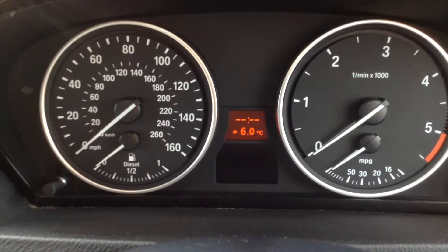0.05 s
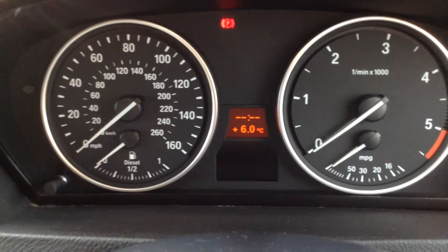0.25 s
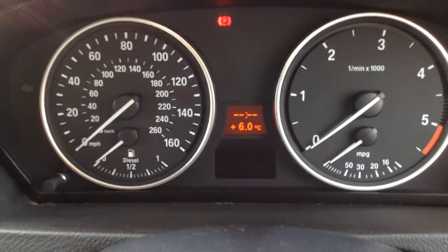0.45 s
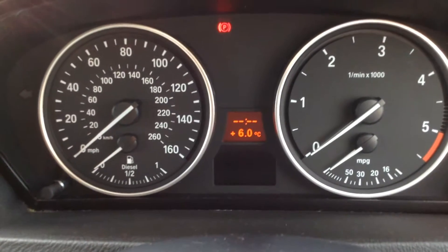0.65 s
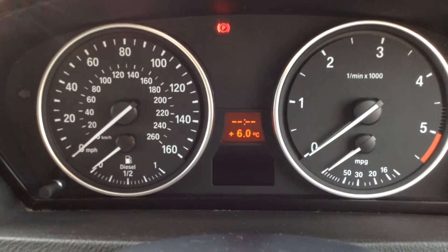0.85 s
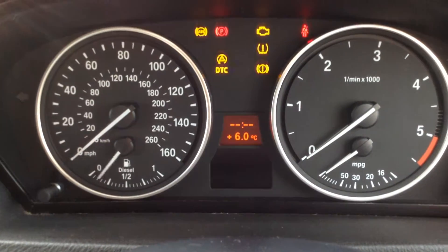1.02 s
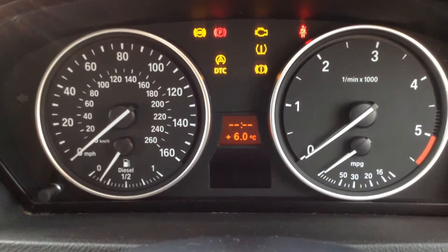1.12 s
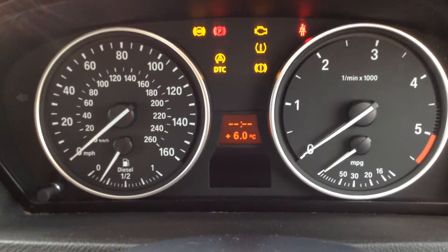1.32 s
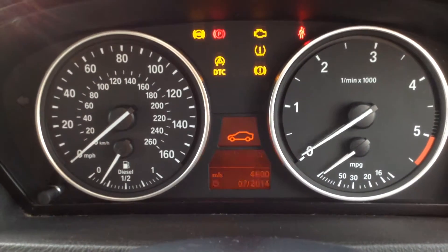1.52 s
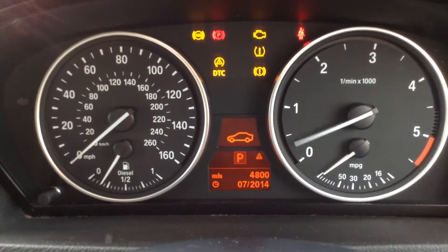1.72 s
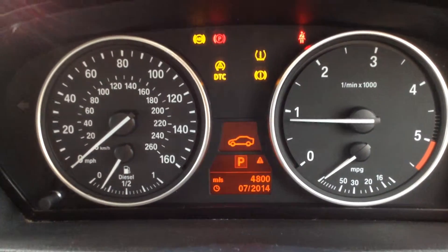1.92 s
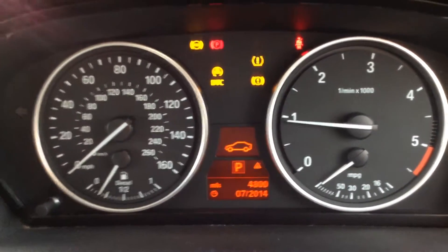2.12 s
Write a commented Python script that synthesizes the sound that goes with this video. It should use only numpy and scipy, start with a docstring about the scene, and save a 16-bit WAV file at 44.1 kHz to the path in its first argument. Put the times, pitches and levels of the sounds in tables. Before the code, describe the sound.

A diesel car engine starts, heard muffled from the driver's seat over faint cabin hiss. Close hand rubbing, rustling and plastic knocks until 0.4 s; a crisp button click at 0.43. A soft pump whirrs from 0.75, a relay snaps at 0.96, and the starter whines and grinds from 1.0 to 1.3. Two groaning firings at 1.35 and 1.45, low thumps, then quickening rumble with light clatter; handling knocks return after 2.0.

```python
"""Driver's seat of a diesel car being started. A hand rubs, rustles and knocks near the microphone
(coloured noise, struck bands, ringing modes); the start button clicks, a fuel pump whirrs (noise) and
a relay snaps. The starter whines over one compression (tooth-rate harmonics plus grinding noise), two
first firings shake the body, and the muffled engine runs up towards idle: noise and wavering
resonances, surging at the firing rate. Cabin hiss lies under it all."""
import sys
import numpy as np
from scipy import signal
from scipy.fft import rfft, irfft, next_fast_len
from scipy.io import wavfile
from scipy.ndimage import map_coordinates

SR = 44100
rng = np.random.default_rng(int(sys.argv[2]) if len(sys.argv) > 2 else 0)


def file_out(sig):
    """Save sig as 16-bit WAV at sys.argv[1]."""
    # one column per channel
    cols = np.atleast_2d(sig).T
    # limit, then scale
    lim = np.clip(cols, -1, 1)
    pcm = np.round(lim * 32767).astype(np.int16)
    wavfile.write(sys.argv[1], SR, pcm)


N = 95608
T = np.arange(N) / SR  # s


def amp(db):
    """Decibels to gain."""
    return 10 ** (np.asarray(db) / 20)


def unit(x):
    """Scale to rms 1."""
    return x / np.sqrt(np.mean(x ** 2) + 1e-20)


def along(points, hz):
    """Read (Hz, value) points on a log-frequency axis."""
    f, v = np.transpose(points)
    return np.interp(np.log(hz + 1), np.log(f + 1), v)


def curves(rows):
    """One value per sample for each column after the time."""
    time_s, *columns = np.transpose(rows)
    return [np.interp(T, time_s, column) for column in columns]


def wobble(rate):
    """Smooth random curve, rate knots per second."""
    return map_coordinates(rng.standard_normal(2048), [T * rate], mode="wrap")


def filtered(x, response):
    """Multiply the spectrum of x by a response of frequency."""
    size = next_fast_len(N + 8192)
    spectrum = rfft(x, size) * response(np.fft.rfftfreq(size, 1 / SR))
    return irfft(spectrum, size)[:N]


def noise(colour):
    """Noise of rms 1 with a (Hz, dB) colour, falling away beyond its ends."""
    low_hz, high_hz = colour[0][0], colour[-1][0]

    def response(hz):
        skirt = np.minimum(1, hz / low_hz) ** 2 / np.maximum(1, hz / high_hz) ** 2
        return amp(along(colour, hz)) * skirt

    return unit(filtered(rng.standard_normal(N), response))


def turns(hz):
    """Phase in radians of a moving frequency, from a random start."""
    return 2 * np.pi * (np.cumsum(hz) / SR + rng.random())


def tone(hz, waver, rate):
    """Slightly unsteady sine of rms 1; waver is a fraction of hz."""
    return np.sqrt(2) * np.sin(turns(hz * (1 + waver * wobble(rate))))


def struck(start_s, t60_s, attack_s=0.00068):
    """Envelope of a blow: exponential attack, 60 dB decay in t60_s."""
    t = np.maximum(T - start_s, 0)
    return (1 - np.exp(-t / attack_s)) * amp(-60 * t / t60_s)


def ringing(modes, waver, rate):
    """Resonances kept going by random shaking, each swelling on its own."""
    return sum(amp(db + 1.22 * wobble(18)) * tone(hz, waver, rate) for hz, db in modes)


# still cabin and microphone hiss: freq_hz, level_db
CABIN_COLOUR = [(25, -28), (60, -14), (105, 6), (215, 0.5), (350, 0), (630, -0.5), (800, -4), (1750, -11.5),
                (5000, -17), (11000, -7.5), (15500, -12.5)]
CABIN_DB = -69.5


def cabin():
    """Steady coloured noise of the still cabin and microphone."""
    return amp(CABIN_DB) * noise(CABIN_COLOUR)


# hand on casing and trim: time_s, rub_db, rustle_db
HAND_LEVELS = [(0, -45, -51), (.022, -42.5, -50), (.055, -51.5, -46.5), (.1, -55, -52.5),
               (.135, -59, -60.5), (.175, -57.5, -56.5), (.208, -49, -52), (.245, -59, -60.5),
               (.3, -58, -61.5), (.34, -64, -63.5), (.45, -64.5, -63), (.53, -76, -69), (.65, -84, -72.5),
               (.85, -75, -67), (1.15, -81, -72), (1.35, -95, -90), (1.96, -80, -80), (2.005, -67, -58.5),
               (2.04, -66, -61), (2.072, -72, -48.5), (2.105, -49.5, -60), (2.17, -61, -59)]
# dull rubbing: freq_hz, level_db
RUB_COLOUR = [(40, -54), (85, -5), (130, 10), (190, 4.5), (330, -1), (480, -2.5), (760, -4.5), (1200, -5.5),
              (2500, -14.5), (5000, -76)]
# grainy rustle: freq_hz, level_db
RUSTLE_COLOUR = [(500, -26), (1500, -7.5), (3000, -4.5), (4500, -3), (6500, -6), (10000, -7), (15000, -11)]
# casing resonances stirred by rubbing: freq_hz, level_db
RUBBED_MODES = [(150, -9), (262, -13), (486, -12), (648, -12)]


def hand():
    """Dull rubbing stirs the casing resonances; a grainy rustle flickers beside it."""
    rub_db, rustle_db = curves(HAND_LEVELS)
    rub = 0.82 * noise(RUB_COLOUR) + ringing(RUBBED_MODES, waver=0.028, rate=74)
    rub *= amp(rub_db + 2.7 * wobble(80))
    rustle = amp(rustle_db + 0.95 * wobble(350)) * noise(RUSTLE_COLOUR)
    return rub + rustle


# small knocks and ticks of plastic: start_s, level_db, centre_hz, width_octaves, t60_s
TRIM_TICKS = [(0.018, -35, 192, 0.64, 0.15), (0.017, -47, 650, 0.46, 0.027),
              (0.0235, -38, 7400, 1.47, 0.018), (0.0499, -30.5, 4450, 0.31, 0.017),
              (0.05, -35.5, 10500, 0.64, 0.012), (0.0831, -36, 3080, 0.7, 0.033),
              (0.115, -49, 2780, .8, 0.028), (0.18, -38, 193, .35, 0.042), (0.195, -38, 3830, 0.72, 0.028),
              (0.2016, -30.5, 8900, 2.6, 0.018), (.201, -36.5, 403, 1.7, 0.031),
              (.362, -55, 1580, 0.65, 0.058), (0.408, -41.5, 2550, 1.6, 0.066),
              (.451, -47, 960, 0.48, 0.044), (.504, -59, 11000, 0.47, 0.027),
              (.5815, -55, 1440, 2.8, 0.063), (.66, -64, 13000, .3, 0.064),
              (0.689, -56.5, 625, 0.14, 0.033), (0.725, -58, 3950, 1.76, 0.026),
              (0.8131, -48, 1800, 0.55, 0.041), (1.049, -55.5, 6050, 2, 0.092),
              (1.562, -49.5, 895, 0.72, .06), (1.629, -59.5, 3230, 0.27, 0.044),
              (1.709, -55, 4500, 1.3, .05), (2, -46, 1080, 0.21, 0.025), (2.0151, -35, 2970, 0.5, 0.019),
              (2.025, -39.5, 1780, 0.62, 0.03), (2.086, -40, 3530, 0.27, 0.054),
              (2.131, -50.5, 2500, 2.2, 0.051)]
SNAP_GAIN, SNAP_T60_S = 0.4, 0.0027  # first contact, relative to the ring


def ticks():
    """Plastic trim: a snap, then a ring dying in its own band; low knocks start softly."""
    out = np.zeros(N)
    for start_s, level_db, centre_hz, width_octaves, t60_s in TRIM_TICKS:
        def band(hz):
            return 1 / (1 + (np.log2((hz + 1) / centre_hz) / width_octaves) ** 2)

        attack_s = 1 / centre_hz
        ring = struck(start_s, t60_s, attack_s)
        snap = SNAP_GAIN * struck(start_s, SNAP_T60_S, attack_s)
        out += amp(level_db) * (ring + snap) * unit(filtered(rng.standard_normal(N), band))
    return out


# knock that sets the casing ringing: start_s, level_db
CASING_KNOCK = (.201, -53)
# casing modes: freq_hz, level_db, t60_s
CASING_MODES = [(436, 2.5, 0.059), (599, 3, 0.1), (719, -7, 1), (790, -6, 0.95), (947, -7.5, 0.78),
                (1314, -16, 0.7), (3460, -9, 0.51)]


def casing():
    """A firm knock leaves the casing ringing unevenly."""
    start_s, knock_db = CASING_KNOCK
    out = np.zeros(N)
    for hz, mode_db, t60_s in CASING_MODES:
        level = amp(knock_db + mode_db + 3.1 * wobble(47.2))
        out += level * struck(start_s, t60_s) * tone(hz, waver=0.0285, rate=200)
    return out


# start button, blow and bounce: start_s, level_db
BUTTON_BLOWS = [(0.429, -34), (0.4343, -38)]
# button spring modes: freq_hz, level_db, t60_s
SPRING_MODES = [(4440, -15, 0.057), (4478, -3.5, 0.048), (4630, -12, 0.037), (7650, -13.5, 0.063),
                (10240, -8, .035), (10260, -7, 0.058), (10740, -3.5, 0.055), (13235, -7.5, 0.071)]
# button crack: freq_hz, level_db
CRACK_COLOUR = [(200, 0.5), (2200, -9.5), (4400, 4), (6000, 1.5), (9000, -1), (10700, 2.5), (12000, 3),
                (15000, -21)]
CRACK_DB, CRACK_T60_S = -1, 0.062


def button():
    """The button snaps and bounces: a crack and the ring of its spring."""
    out = np.zeros(N)
    for start_s, blow_db in BUTTON_BLOWS:
        ring = sum(amp(mode_db) * struck(start_s, t60_s) * tone(hz, waver=0.0032, rate=630)
                   for hz, mode_db, t60_s in SPRING_MODES)
        crack = amp(CRACK_DB) * struck(start_s, CRACK_T60_S) * noise(CRACK_COLOUR)
        out += amp(blow_db) * (ring + crack)
    return out


# fuel pump: time_s, level_db
PUMP_LEVELS = [(.7, -74), (.765, -65.5), (.782, -56), (.82, -61.5), (.85, -63), (.95, -60), (1.02, -64.5),
               (1.2, -60)]
# pump whirr: freq_hz, level_db
PUMP_COLOUR = [(35, -44), (60, -9), (178, 4), (349, -4.5), (420, -6), (632, -4), (1030, -10), (1990, -10.5),
               (2440, -17.5), (8000, -23), (10400, -38), (17600, -120)]


def pump():
    """The fuel pump primes with a soft whirr of coloured noise."""
    level_db, = curves(PUMP_LEVELS)
    return amp(level_db) * noise(PUMP_COLOUR)


# starter relay closing, then opening: start_s, snap_db, ring_db
RELAY_MOVES = [(0.9639, -39.5, -48), (1.71, -51.5, -46)]
# relay snap: freq_hz, level_db
RELAY_COLOUR = [(110, -36), (300, 5), (950, -9), (1210, -4.5), (1700, 2.5), (2050, 4), (3000, -11.5),
                (4400, 1.5), (5500, -8.5), (7400, -7), (8500, -12.5), (10500, -3), (15000, -12)]
# relay can modes: freq_hz, level_db, t60_s
CAN_MODES = [(1205, 2.5, 0.072), (1470, -14.5, 0.22), (2030, 1, 0.023), (2280, -5.5, 0.052),
             (4200, -11, 0.055)]
RELAY_T60_S, RELAY_TAIL_DB, RELAY_TAIL_T60_S = 0.057, -9, 0.17


def relay():
    """The starter relay snaps shut and later lets go; its can rings briefly."""
    out = np.zeros(N)
    for start_s, snap_db, ring_db in RELAY_MOVES:
        snap = struck(start_s, RELAY_T60_S, attack_s=0.00078)
        snap += amp(RELAY_TAIL_DB) * struck(start_s, RELAY_TAIL_T60_S)
        ring = sum(amp(mode_db) * struck(start_s, t60_s, attack_s=0.002) * tone(hz, waver=0.0081, rate=300)
                   for hz, mode_db, t60_s in CAN_MODES)
        out += amp(snap_db) * snap * noise(RELAY_COLOUR) + amp(ring_db) * ring
    return out


# starter gear: time_s, tooth_rate_hz, whine_db, grind_db
STARTER_RUN = [(.99, 140.1, -67, -55), (1.035, 170.7, -69, -48.5), (1.07, 203.5, -57.5, -52),
               (1.1, 231.1, -51, -49), (1.135, 246.7, -52, -48), (1.158, 277.8, -60, -51.5),
               (1.18, 317.7, -48.5, -53), (1.203, 325.4, -46, -64), (1.226, 302, -46.5, -47),
               (1.248, 255.6, -43, -49), (1.266, 227.6, -52.5, -45), (1.295, 236, -60.5, -54),
               (1.33, 205, -67.5, -65)]
# tooth-rate harmonics 1-4: level_db
TOOTH_HARMONICS_DB = [5.5, 0, -4, -5]
# path from starter into cabin: freq_hz, gain_db
BULKHEAD_PATH = [(130, -14), (230, -3), (270, -10.5), (325, -1), (400, 1), (465, 9), (540, -1.5),
                 (640, -2.5), (720, -7), (820, 3.5), (1000, -17.5), (1280, -8.5), (1700, -12)]
# grinding: freq_hz, level_db
GRIND_COLOUR = [(50, -30), (90, -11), (160, -3.5), (260, -3), (370, -7), (510, -1), (680, -12), (820, -9.5),
                (1070, -24), (1250, -17), (1500, -46), (3200, -29), (5000, -67), (7000, -62)]
WHINE_WAVER = 0.014  # fraction of tooth rate


def starter():
    """Gear teeth whine through the bulkhead, speed up, then sag and grind against compression."""
    tooth_hz, whine_db, grind_db = curves(STARTER_RUN)
    phase = turns(tooth_hz * (1 + WHINE_WAVER * wobble(200)))
    whine = np.zeros(N)
    for k, harmonic_db in enumerate(TOOTH_HARMONICS_DB, 1):
        level_db = harmonic_db + along(BULKHEAD_PATH, k * tooth_hz) + 2.2 * wobble(70)
        whine += amp(level_db) * np.sqrt(2) * np.sin(k * phase)
    engaged = (T > STARTER_RUN[0][0]) & (T < STARTER_RUN[-1][0])
    return engaged * (amp(whine_db) * whine + amp(grind_db) * noise(GRIND_COLOUR))


# first firings: start_s, hold_s, level_db
FIRST_FIRINGS = [(1.334, 0.026, -37.5), (1.448, 0.027, -38.5)]
# body resonances shaken by them: freq_hz, level_db
BODY_MODES = [(328, 0.5), (404, -5.5), (466, -15), (812, -14)]
# firing roar: freq_hz, level_db
ROAR_COLOUR = [(40, -30), (80, -12.5), (160, -6), (300, -2), (520, -5), (620, -7.5), (700, -11), (810, -11),
               (1100, -16), (1600, -32.5), (3000, -34), (6000, -57)]
ROAR_DB = -4
RISE_S, RISE_DB, FALL_DB_PER_S = 0.021, 13, 1303
SHUDDER_DB, SHUDDER_T60_S = -9.5, 0.29


def first_firings():
    """Each compression swells, holds and falls; the body groans at its resonances and shudders on."""
    push = np.zeros(N)
    for start_s, hold_s, level_db in FIRST_FIRINGS:
        t = T - start_s
        rise_db = RISE_DB * np.minimum(t / RISE_S - 1, 0)
        fall_db = FALL_DB_PER_S * np.maximum(t - RISE_S - hold_s, 0)
        fade_in = np.clip(t / 0.0033, 0, 1)
        push += fade_in * amp(level_db + rise_db - fall_db)
        shudder = struck(start_s + RISE_S + hold_s, SHUDDER_T60_S, attack_s=0.008)
        push += amp(level_db + SHUDDER_DB) * shudder
    groan = sum(amp(mode_db + 1.7 * wobble(90)) * tone(hz, waver=0.018, rate=110)
                for hz, mode_db in BODY_MODES)
    roar = amp(ROAR_DB + wobble(150)) * noise(ROAR_COLOUR)
    return push * (groan + roar)


# engine rocking on its mounts as it catches: start_s, level_db
MOUNT_THUMPS = [(1.362, -46.5), (1.482, -44), (1.555, -48), (1.612, -43), (1.633, -39), (1.698, -44),
                (1.745, -43), (2.105, -70)]
# thump: freq_hz, level_db
THUMP_COLOUR = [(45, -22), (78, -0.5), (115, 4.5), (165, -7.5), (240, 4.5), (330, -12), (600, -33)]
THUMP_T60_S = 0.17


def thumps():
    """Soft low shoves from the first strong firings: struck envelopes on one low noise."""
    shoves = sum(amp(level_db) * struck(start_s, THUMP_T60_S, attack_s=0.006)
                 for start_s, level_db in MOUNT_THUMPS)
    return shoves * noise(THUMP_COLOUR)


# running engine: time_s, firing_rate_hz, rumble_db, clatter_db
ENGINE_RUN = [(1.48, 9, -80, -81), (1.52, 10, -60, -69), (1.585, 14, -53.5, -71), (1.62, 17, -44, -80),
              (1.648, 17, -49, -66), (1.68, 22, -47.5, -66), (1.735, 27, -49, -60),
              (1.775, 31, -48.5, -65.5), (1.85, 38, -52, -63), (1.93, 44, -51.5, -59.5),
              (2.01, 48, -49, -52), (2.12, 50, -50.5, -54.5), (2.17, 50, -48.5, -57)]
# rumble: freq_hz, level_db
RUMBLE_COLOUR = [(18, -57), (30, 4), (49, -21), (108, -12), (197, 3), (236, -4), (271, -0.5), (401, -3.5),
                 (426, -7), (466, -2.5), (510, -7), (669, -8), (1100, -21.5), (1430, -53), (2420, -120)]
# clatter: freq_hz, level_db
CLATTER_COLOUR = [(500, -30), (1000, 6), (1500, -1.5), (1900, 0.5), (2200, -1.5), (2550, -8), (3000, -4),
                  (4300, -8), (6000, -18), (14000, -52)]
# droning panels: freq_hz, level_db (re rumble)
PANEL_MODES = [(79, -15), (114, -13.5), (246, -17.5), (328, -12.5), (399, -8), (466, -17)]
# engine block ringing: freq_hz, level_db (re clatter)
BLOCK_MODES = [(999, -15.5), (1071, -15), (1434, -18.5), (1760, -34), (1963, -23), (2170, -14), (2215, -11),
               (2880, -22), (3300, -15), (3480, -20)]
RUMBLE_DEPTH, CLATTER_DEPTH = 0.14, 0.64  # surge per firing, over a steady 1


def engine():
    """Quickening firings each surge the rumble and tick the clatter; panels drone, the block rings."""
    firing_hz, rumble_db, clatter_db = curves(ENGINE_RUN)
    cycle = np.cumsum(firing_hz * (T > ENGINE_RUN[0][0])) / SR % 1
    surge = unit(1 + RUMBLE_DEPTH * np.cos(2 * np.pi * cycle))
    knock = unit(1 + CLATTER_DEPTH * np.exp(-cycle / 0.3))
    rumble = noise(RUMBLE_COLOUR) + ringing(PANEL_MODES, waver=0.0101, rate=36)
    clatter = noise(CLATTER_COLOUR) + ringing(BLOCK_MODES, waver=0.0051, rate=160)
    return amp(rumble_db) * surge * rumble + amp(clatter_db) * knock * clatter


def scene():
    """Sum of everything reaching the driver's seat."""
    near = hand() + ticks() + casing() + button()
    car = pump() + relay() + starter() + first_firings() + thumps() + engine()
    return (cabin() + near + car)[None]


LOW_CUT_HZ, TOP_HZ = 61, 15450


def record(dry):
    """The microphone thins the deep bass and keeps nothing above its band limit."""
    high_pass = signal.butter(2, LOW_CUT_HZ, "highpass", fs=SR, output="sos")
    sound = signal.sosfilt(high_pass, dry[0])
    return filtered(sound, lambda hz: hz < TOP_HZ)[None]


dry = scene()
out = record(dry)
file_out(out)
```